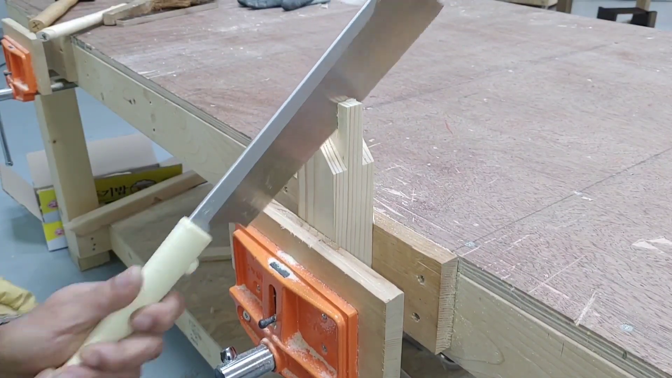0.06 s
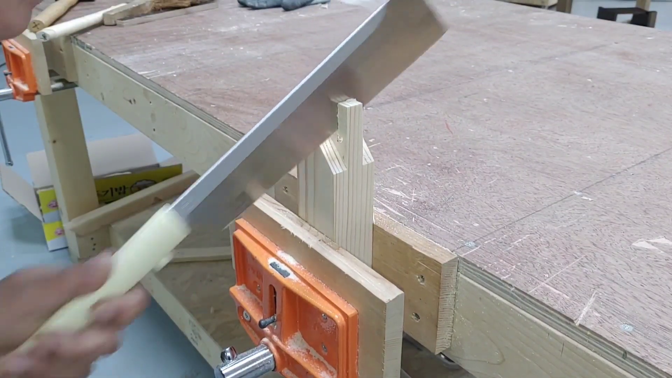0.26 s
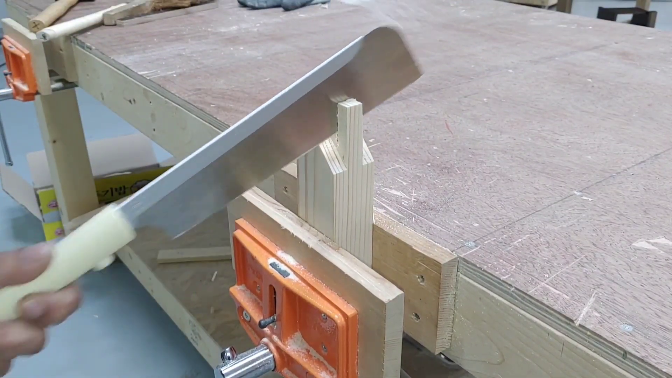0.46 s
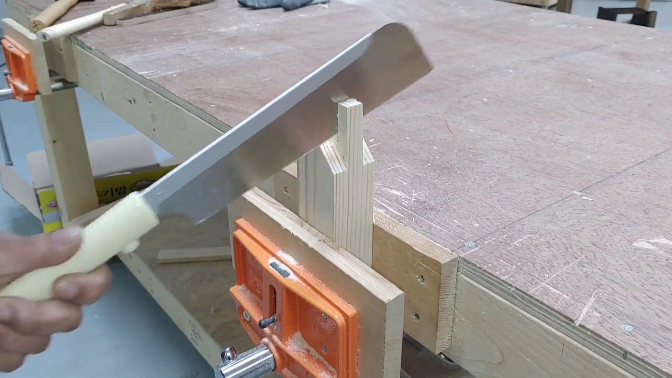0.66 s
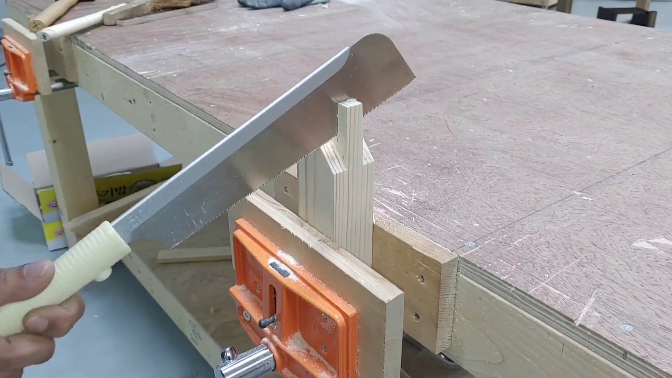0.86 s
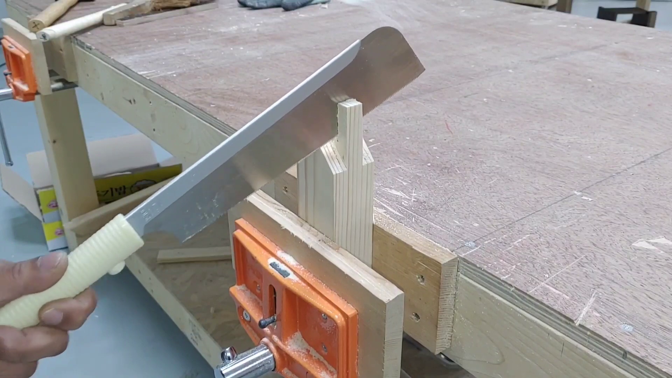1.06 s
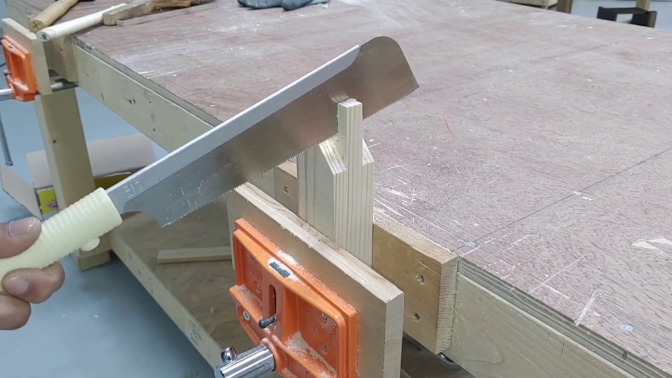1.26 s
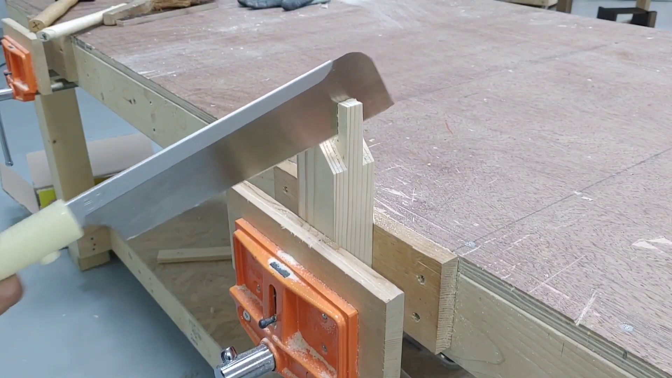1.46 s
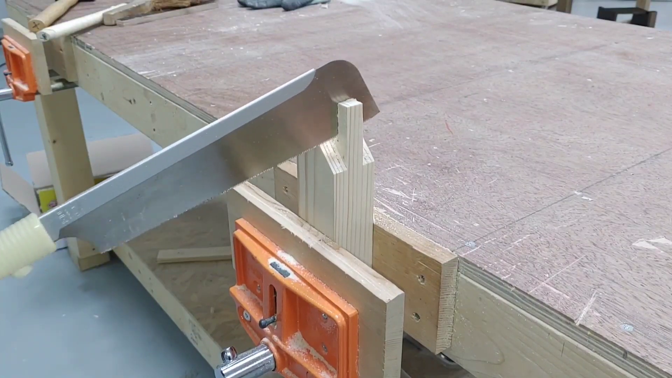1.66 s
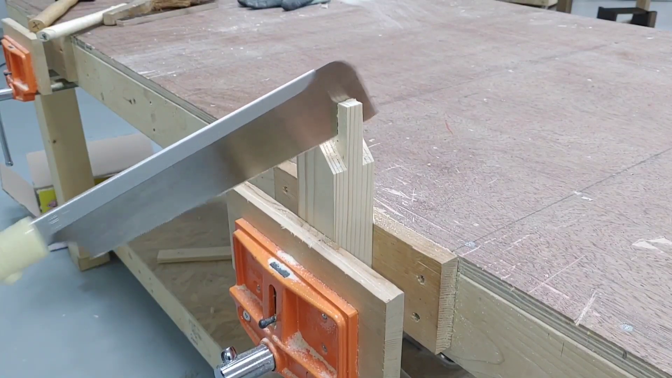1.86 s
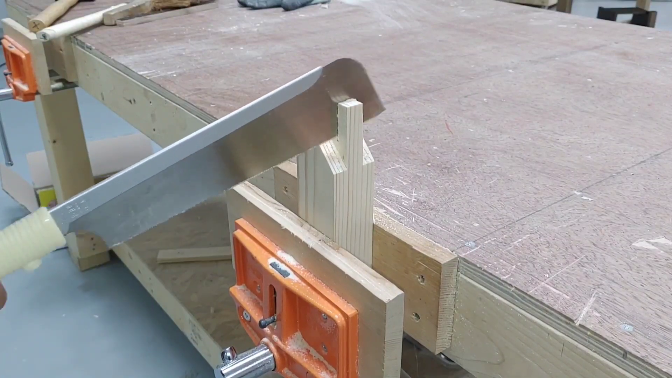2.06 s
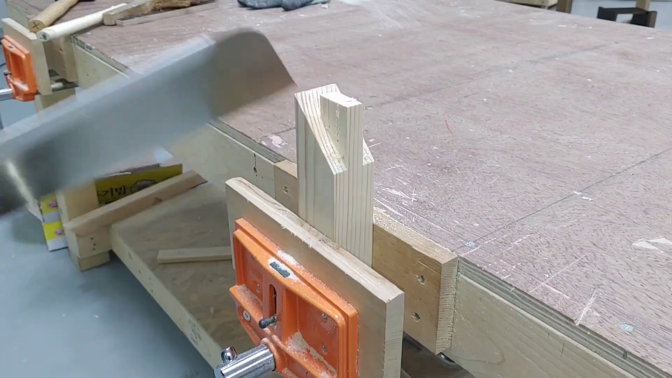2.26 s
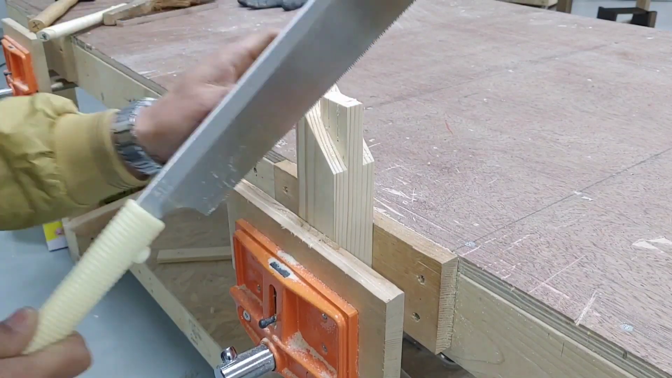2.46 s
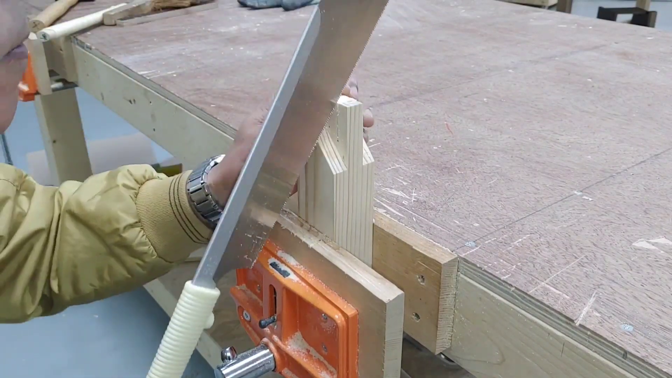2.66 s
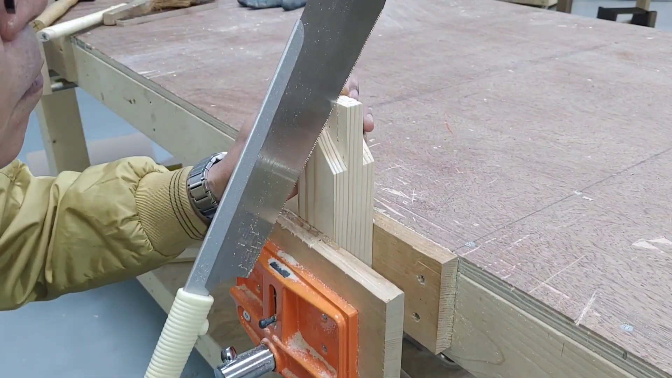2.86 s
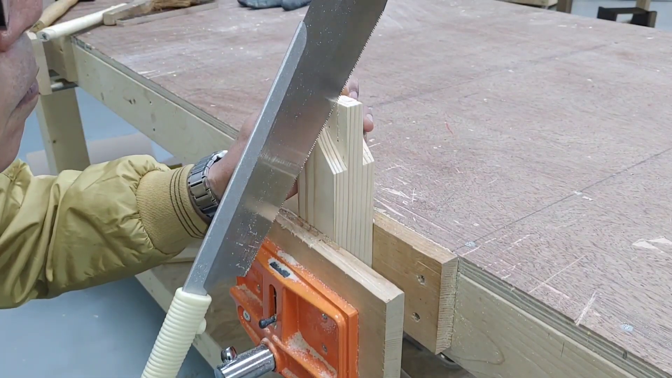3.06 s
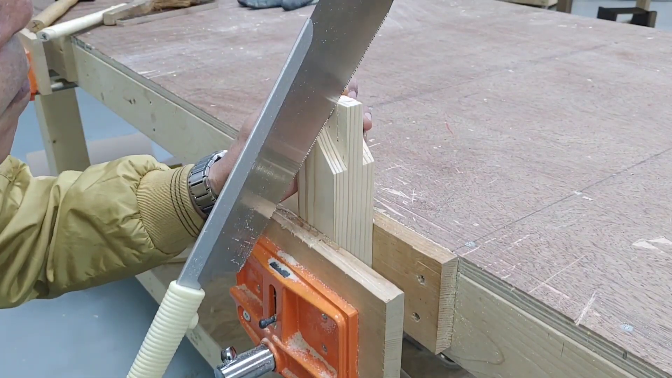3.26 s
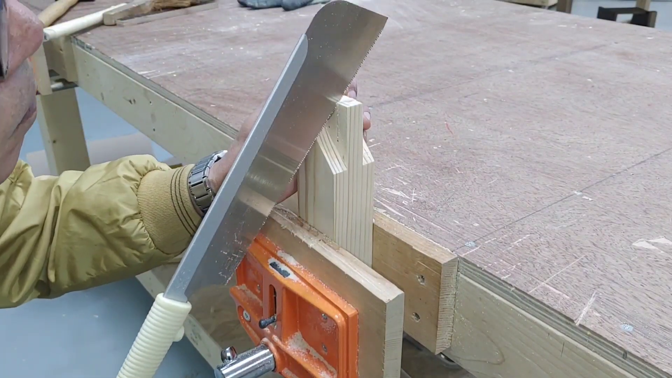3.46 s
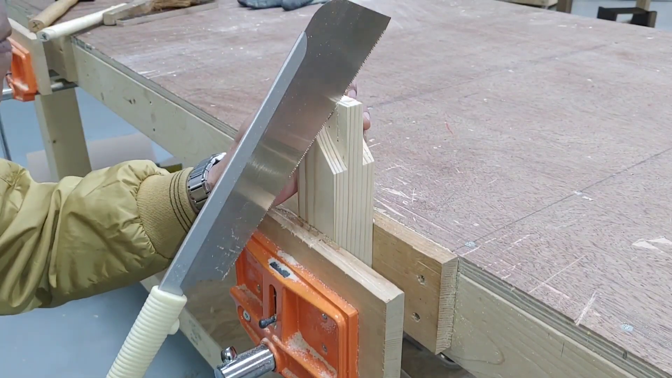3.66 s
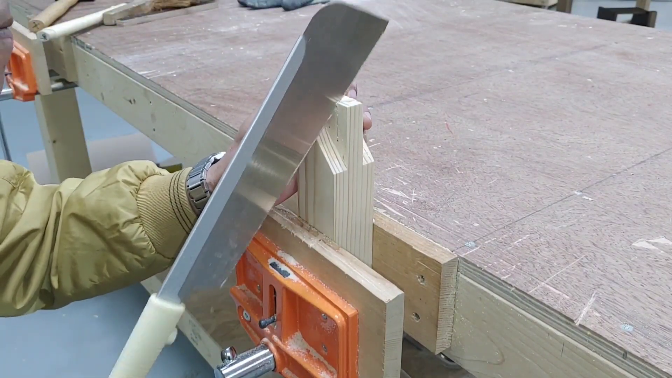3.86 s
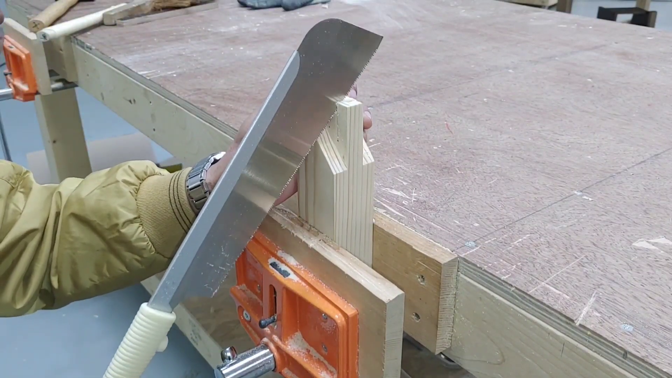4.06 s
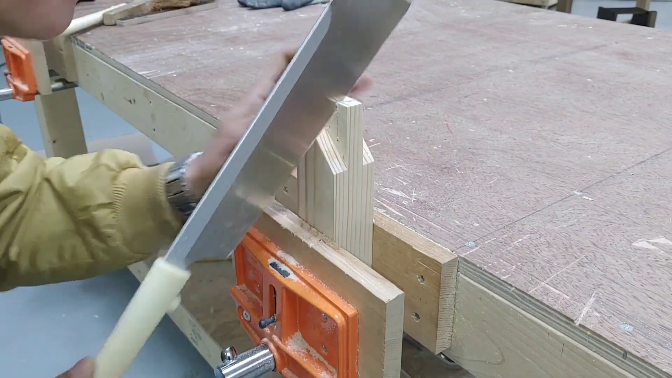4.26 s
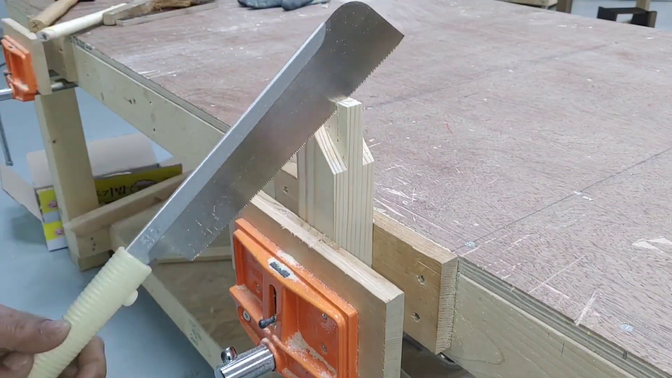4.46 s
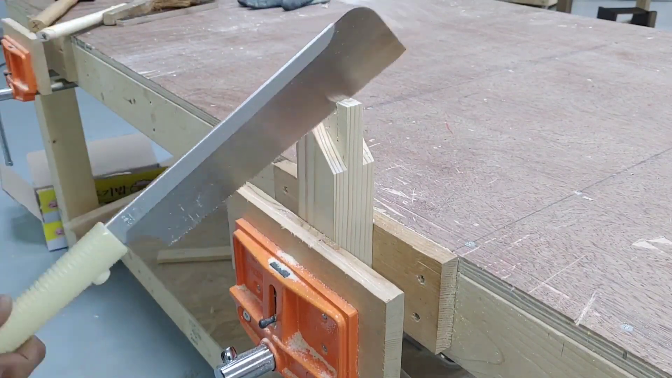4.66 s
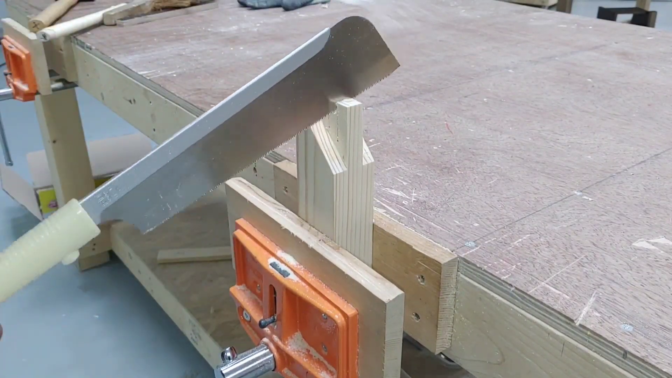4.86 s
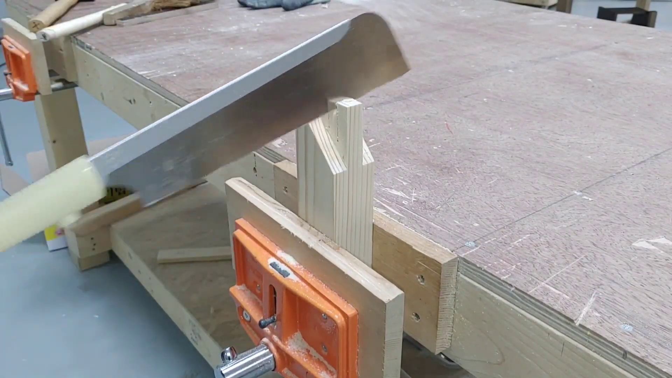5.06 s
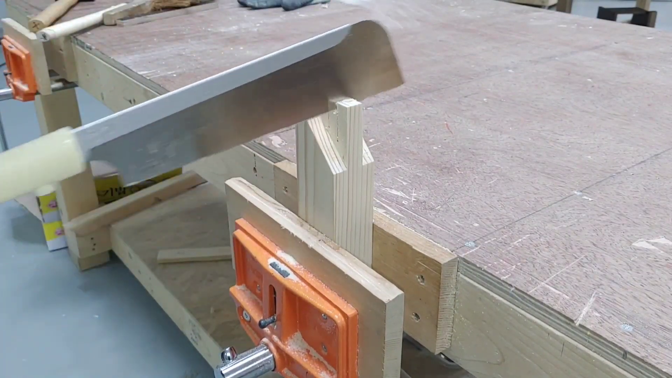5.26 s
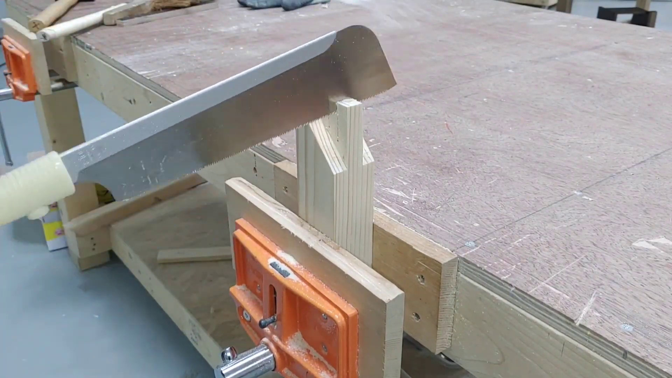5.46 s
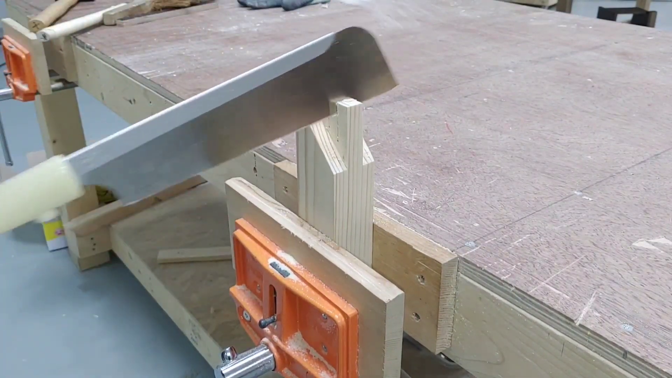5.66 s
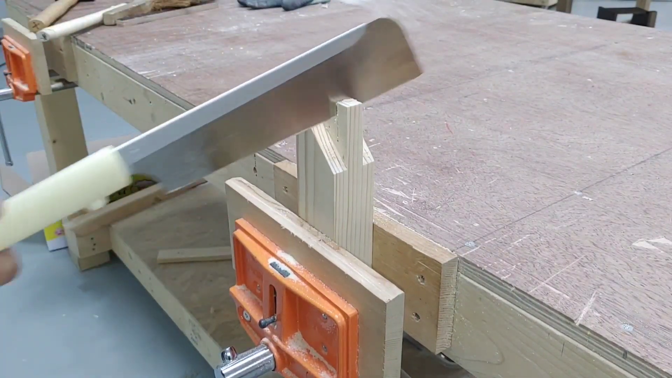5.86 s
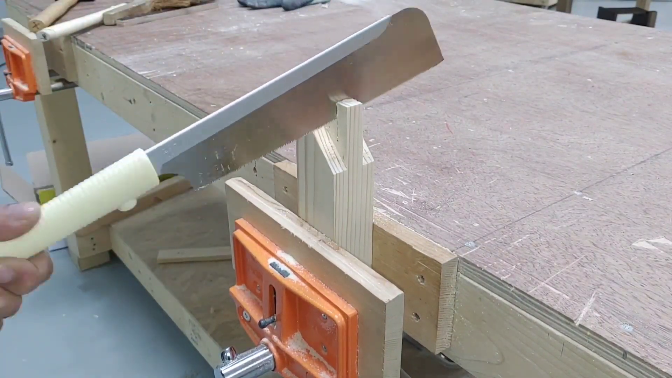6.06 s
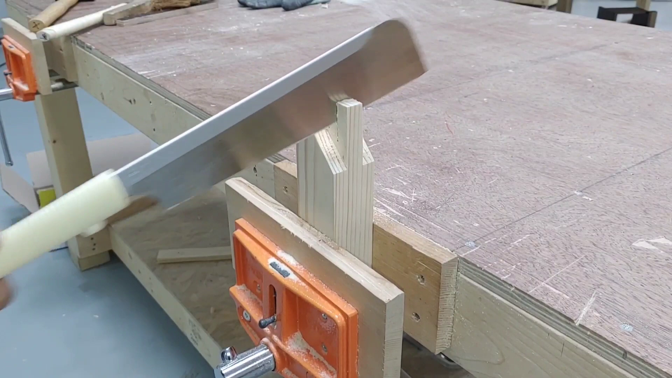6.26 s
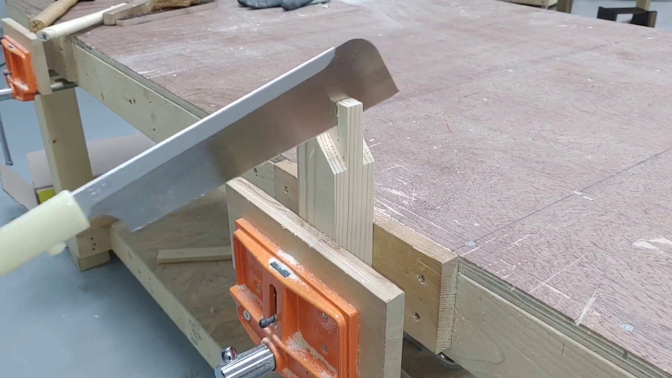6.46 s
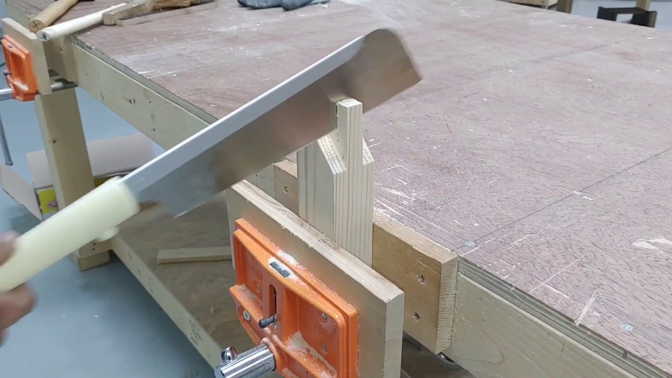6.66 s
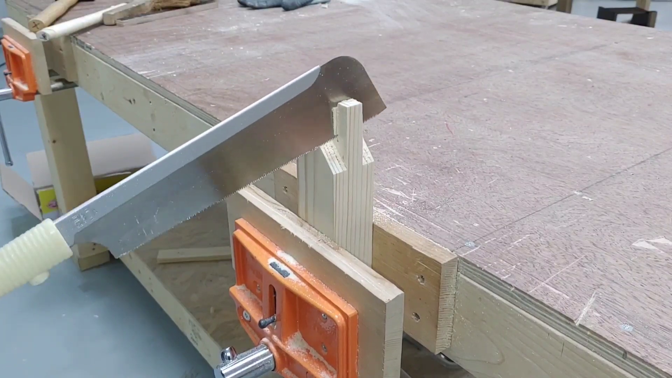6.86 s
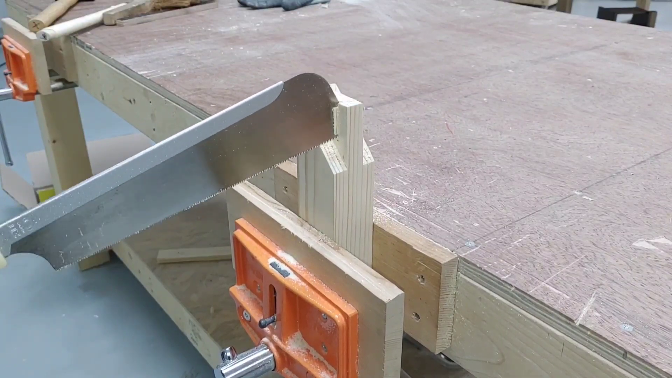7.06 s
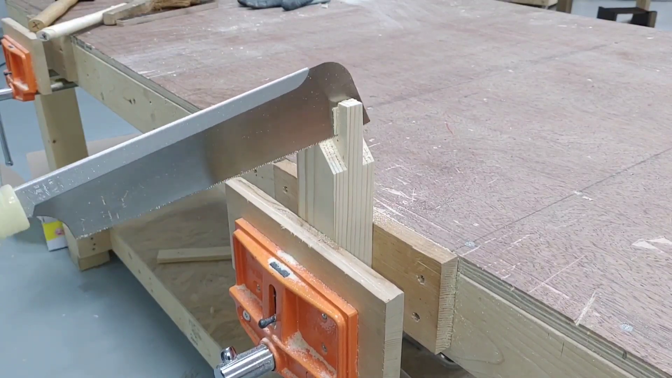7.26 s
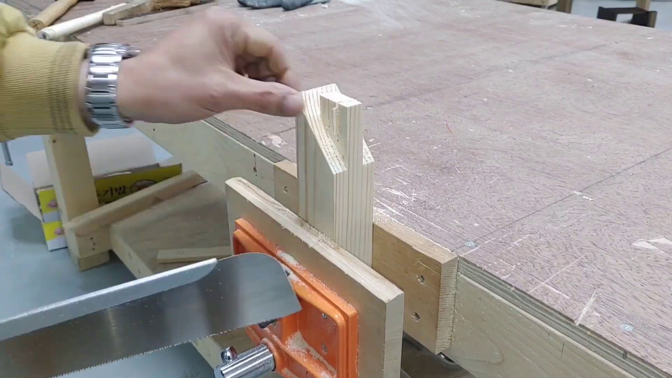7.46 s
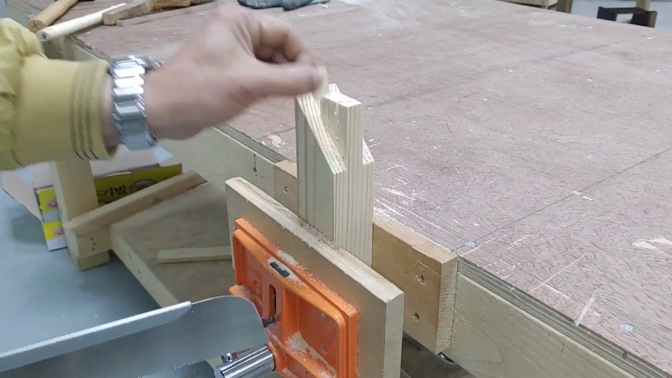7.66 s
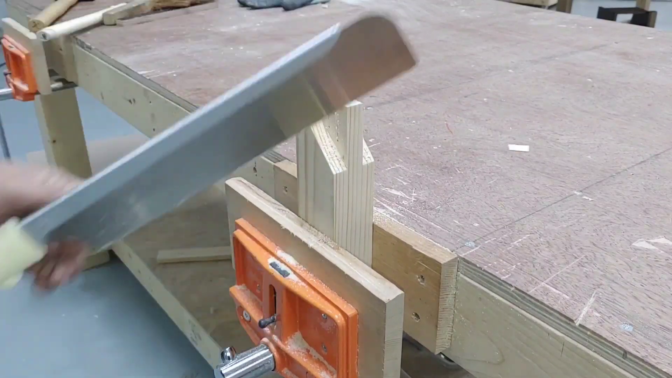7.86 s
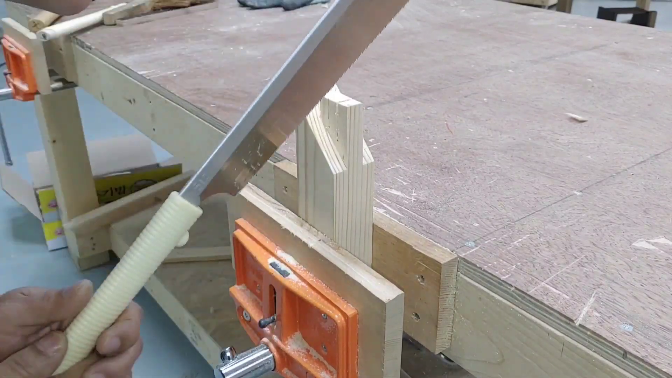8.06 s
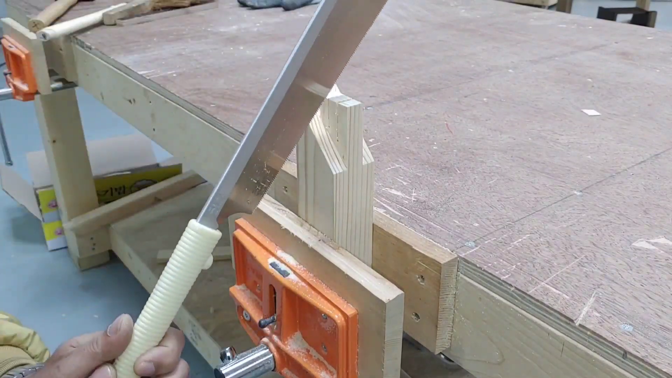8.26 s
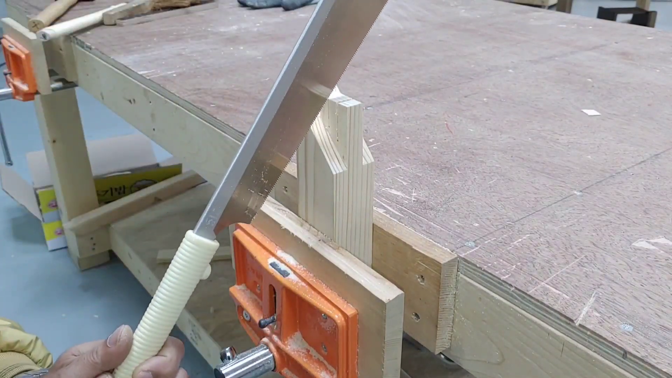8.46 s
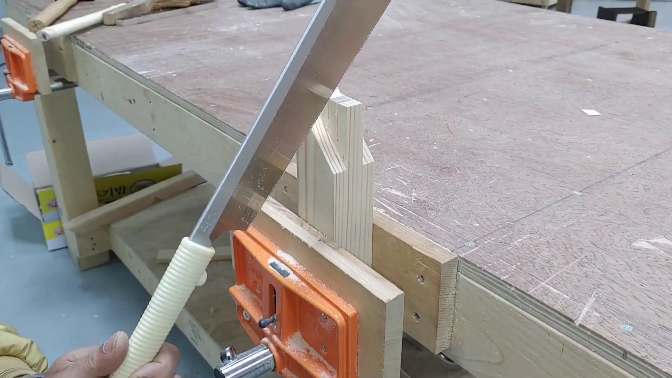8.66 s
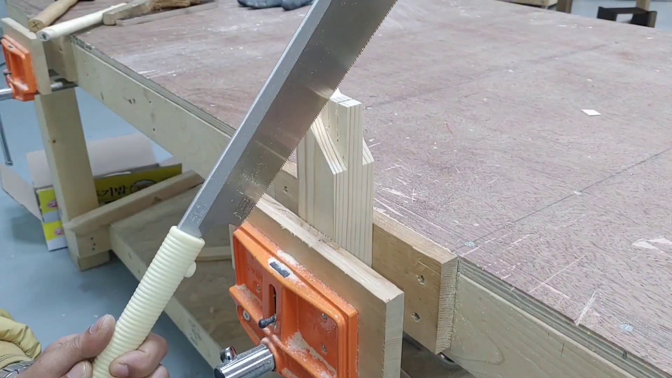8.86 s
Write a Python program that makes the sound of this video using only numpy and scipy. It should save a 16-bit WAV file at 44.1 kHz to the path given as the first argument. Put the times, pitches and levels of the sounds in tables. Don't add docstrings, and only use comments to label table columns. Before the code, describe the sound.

Loud uneven sawing starts at once, each stroke knocking the clamped board and bench, with a few harder tooth catches. It stops; only faint scrapes and low room rumble remain. Hesitant light strokes begin again and grow into an even, fast scratching. The last pulls are sparse and quiet, then a dry crack frees a sliver of wood, which ticks down and bounces before near silence. Close stereo pickup in a small, briefly echoing workshop.

```python
import sys
import numpy as np
from scipy import signal
from scipy.fft import rfft, irfft
from scipy.io import wavfile
from scipy.ndimage import uniform_filter1d

SR = 44100
rng = np.random.default_rng(int(sys.argv[2]) if len(sys.argv) > 2 else 0)


def decibels_to_gain(level_db):
    exponent = np.asarray(level_db, float) / 20
    return 10 ** exponent


def pcm_store(signal):
    levels = np.round(np.clip(np.atleast_2d(signal), -1, 1) * 32767)
    wavfile.write(sys.argv[1], SR, levels.astype(np.int16).T)


N = 392490
SIZE, PAD = 10240, 512
HZ, T = np.maximum(np.fft.rfftfreq(SIZE, 1 / SR), 1), np.arange(SIZE) / SR
LEAD_S = .008

# f/Hz, likeness/0-1
COHERENCE = [(100, 0.94), (300, 0.89), (700, 0.5), (1500, 0), (4000, 0.04)]


def unit(x):
    return x / np.sqrt(np.mean(x ** 2))


def on_log(table, hz=HZ):
    at, value = np.transpose(table)
    return np.interp(np.log(hz), np.log(np.maximum(at, 1)), value)


def modes(table):
    response = 0
    for k, (f, width, db) in enumerate(table):
        damping = 1j * HZ * width
        response = response + (-1) ** k * decibels_to_gain(db) * damping / (f * f - HZ ** 2 + damping)
    return response


def soft(hz):
    return 1 / (1 + 1j * HZ / hz)


def through(x, response):
    return irfft(rfft(x) * response, x.shape[-1])


def played(drive, envelope, response):
    steady = np.sqrt(2 * np.sum(np.abs(rfft(drive) * response) ** 2)) / SIZE
    return through(drive * envelope, response) / steady


def swell(length, db, rise_s, sag_db, fall_s):
    fade = np.exp(-np.maximum(T - length + fall_s, 0) / fall_s)
    rise = np.sin(np.pi / 2 * np.minimum(T / rise_s, 1)) ** 2
    return decibels_to_gain(db - sag_db * T / length) * rise * fade


def pair(alike, size):
    mid, side = rng.standard_normal((2, size))
    alike = np.clip(alike, -1, 1)
    mid = through(mid, np.sqrt((1 + alike) / 2))
    side = through(side, np.sqrt((1 - alike) / 2))
    return np.array([mid + side, mid - side])


def teeth(length, rate_hz, jitter=.35, scatter_db=3.0):
    speed = .8 + .4 * np.sin(np.pi * np.minimum(T / length, 1))
    at = np.flatnonzero(np.diff(np.floor(.6 + np.cumsum(rate_hz * speed / SR))))
    chance = rng.standard_normal((300, 2))[:len(at)]
    knocks = np.zeros(SIZE)
    moved = (at + jitter * chance[:, 0] * SR / rate_hz).astype(int) % SIZE
    np.add.at(knocks, moved, decibels_to_gain(scatter_db * chance[:, 1]))
    return unit(knocks - np.mean(knocks))


def shifted(table, spread, scatter_db):
    chance = rng.standard_normal((len(table), 2))
    return [(f * (1 + spread * a), w, db + scatter_db * b) for (f, w, db), (a, b) in zip(table, chance)]


def stroke(length, blade_db, bench_db, ring_db, rate_hz, sing_db, tilt_db):
    # f/Hz, width/Hz, level/dB
    bench_modes = [(45, 37, -3), (132, 62.5, 2.5), (330, 236, -8.5), (538, 117, -16)]
    board_modes = [(879.4, 61, 5), (878, 590, -6.5), (1540, 310, -14)]
    blade_modes = [(2353, 76, -2.5), (4130, 320, 0.5), (6126, 330, -2.5), (7370, 410, -7),
                   (9820, 1300, -10.5)]
    # f/Hz, level/dB
    fibres = [(300, 1), (1500, -7), (3000, -15), (5000, -28), (8000, -38), (16000, -23)]
    length = length + LEAD_S
    knocks = teeth(length, rate_hz)
    rub = rng.standard_normal((3, SIZE))
    slow = np.log2(250 / rate_hz)

    push = unit(through(knocks, soft(700.))) + 0.51 * unit(through(rub[0], soft(380.0)))
    weight = (np.maximum(HZ, 120) / 220) ** (-1.2 * slow)
    body = modes([(rate_hz, 0.47 * rate_hz, -2.)]) + modes(shifted(bench_modes, 0.047, 1.9)) * weight
    bench = played(push, swell(length, bench_db + 1.0, 0.024, 7.5, 0.0093), body)

    ring = swell(length, ring_db + 0.5, 0.032, 10.33, 0.022)
    board = played(knocks + 1.9 * rub[1], ring, modes(shifted(board_modes, 0.025, 0.78)))

    gate = 6.6 + unit(np.abs(through(knocks, soft(100.0))))
    crackle = rub[2] * gate * decibels_to_gain(0.41 * rng.exponential(size=SIZE))
    hiss = decibels_to_gain(on_log(fibres) - 1.0 + tilt_db * np.log2(np.maximum(HZ / 3000, 1)))
    sing = decibels_to_gain(sing_db + 2.7 * tilt_db * np.log2(HZ / 3000)) * modes(shifted(blade_modes, 0.012, 0.4))
    cut = swell(0.92 * length, blade_db + 6.5, .024 - 0.012 * slow, 10.8 + 6.9 * slow, .012)
    return bench + board + played(crackle, cut, sing + hiss)


def strokes():
    # t/s, pull force level/dB, bite level/dB, return force level/dB (-99 = the saw stalls or lifts)
    fast_cut = [(-.052, -23, -17.5, -99), (.006, -14, -29.5, -24.5), (.098, -17.5, -27, -21.5),
                (.188, -12, -30.5, -16.5), (.283, -18, -32.5, -21.5), (.386, -17.5, -30.5, -21),
                (.47, -22, -32, -19), (.567, -17, -30.5, -20.5), (.662, -19, -31, -24.5),
                (.744, -21, -35, -24), (.826, -19, -37, -28), (.91, -16.5, -35.5, -24.5),
                (.978, -24.5, -36, -29), (1.045, -26, -41.5, -27)]
    choppy_cut = [(1.131, -17, -37, -23), (1.199, -19, -36, -25.5), (1.296, -26, -33.5, -60),
                  (1.391, -15.5, -30.5, -21), (1.549, -17.5, -36, -25.5), (1.64, -15, -31, -29),
                  (1.709, -17.5, -35, -29.5), (1.789, -15, -34, -27), (1.851, -15, -32.5, -24),
                  (1.924, -13.5, -32.5, -29), (2.069, -13.5, -36.5, -26.5), (2.158, -19.5, -34, -25),
                  (2.225, -13, -30.5, -26), (2.29, -13, -33.5, -24), (2.356, -19, -36, -22),
                  (2.423, -16, -38.5, -43)]
    new_kerf = [(3.298, -45.5, -77, -99), (3.563, -43.5, -62, -99), (3.64, -38, -59.5, -67),
                (3.703, -33.5, -55, -99), (3.845, -36, -56, -99), (3.897, -26.5, -60, -63),
                (3.952, -29.5, -44.5, -99), (4.015, -30, -48.5, -99), (4.065, -20.5, -35.5, -99),
                (4.11, -22, -41, -99), (4.159, -27, -38, -23), (4.245, -22, -35.5, -99),
                (4.379, -24.5, -43, -24.5), (4.469, -21, -33, -24.5), (4.528, -23, -34.5, -23.5),
                (4.581, -24.5, -32, -99)]
    steady_cut = [(4.771, -28, -47.5, -35), (4.845, -28, -36, -27.5), (4.945, -25.5, -35.5, -30.5),
                  (5.046, -24, -34.5, -25), (5.124, -20.5, -35.5, -31.5), (5.265, -26, -35.5, -31.5),
                  (5.36, -21.5, -36, -25), (5.454, -22, -31.5, -25.5), (5.539, -20, -33.5, -23.5),
                  (5.635, -21, -32, -24), (5.723, -24.5, -32, -22), (5.821, -22, -31, -25),
                  (5.911, -21, -31, -22.5), (6.006, -21, -29, -20), (6.091, -19, -33, -21.5),
                  (6.187, -22.5, -32, -22.5), (6.28, -19.5, -32, -21.5), (6.373, -18.5, -33.5, -20.5),
                  (6.456, -17, -32, -20.5), (6.541, -16, -32.5, -21), (6.64, -16.5, -31, -22),
                  (6.716, -15.5, -33, -18.5), (6.807, -17, -33, -21.5), (6.896, -15.5, -31, -99)]
    last_fibres = [
        (7.036, -30.5, -45, -47),
        (7.107, -29, -40, -43),
        (7.292, -37, -53.5, -40.5),
        (7.402, -21, -41.5, -40.5),
    ]
    # t/s, blade ring level/dB, hiss tilt/dB per octave, tooth rate f/Hz, board over bite level/dB
    kerf = [(0, -2.5, -5, 261.8, 3), (.75, -2.5, -3.5, 275.1, 12), (1.001, -1.5, -3.5, 234.6, 9),
            (1.141, -5.5, -4, 158.8, 5), (1.302, -11.5, -4, 188.6, -9), (1.55, -5.5, -4, 217.9, 11),
            (1.852, -6.5, -3, 158.8, 7), (2.102, 2, -5.5, 216.8, 9.5), (2.5, -5.5, -2, 173.6, 12),
            (3.5, -10, 0, 189, -2), (4.098, -7.5, -2, 193.7, 0), (4.399, -11, -1.5, 255, 5),
            (4.702, -6.5, -2, 201.2, 8.5), (5.3, -0.5, -2, 243.5, 9.5), (5.852, -4.5, -2, 292.9, 10.5),
            (6.052, -4, -2, 250.7, 10), (6.7, -5, -3, 299.5, 13), (7.402, -5, -2.5, 184.6, 7.5)]
    longest_stroke_s = .104
    speed_scatter, return_speed = .06, 1.15
    return_blade_db, return_ring_db = -17, -15

    table = fast_cut + choppy_cut + new_kerf + steady_cut + last_fibres
    at, *columns = np.transpose(kerf)
    for (s, pull_db, bite_db, back_db), (later, *_) in zip(table, table[1:] + [(np.inf,)]):
        if later - s > longest_stroke_s:
            pull_s, back_at_s, back_s = .033, .042, .055
        else:
            pull_s, back_at_s, back_s = (later - s) * np.array([.46, .55, .42])
        sing_db, tilt_db, rate_hz, ring_db = (np.interp(s, at, column) for column in columns)
        rate_hz = rate_hz * (1 + speed_scatter * rng.standard_normal())
        yield s - LEAD_S, stroke(pull_s, bite_db, pull_db, bite_db + ring_db, rate_hz, sing_db, tilt_db)
        if back_db > -80:
            back = stroke(back_s, bite_db + return_blade_db, back_db, back_db + ring_db + return_ring_db,
                          return_speed * rate_hz, sing_db, tilt_db)
            yield s + back_at_s - LEAD_S, back


def shop(hz):
    # f/Hz, level/dB per Hz
    rumble = [(34, -11.5), (78, -11), (124, -4), (221, -14.5), (616, -20), (4910, -32), (7870, -39),
              (16000, -31)]
    level_db = -59.5
    air = through(pair(on_log(COHERENCE, hz), size=N), decibels_to_gain(on_log(rumble, hz)))
    waver = unit(uniform_filter1d(rng.standard_normal(N), size=3000))
    return unit(air) * decibels_to_gain(level_db + 1.4 * waver)


def tick(db, hz, t60, knock_db, edge_db):
    crack = 0.14 * rng.standard_normal(SIZE) * np.exp(-np.log(1000) * T / max(t60, .002))
    crack[0] = 1
    middle = modes([(hz, 0.54 * hz, 0)]) * modes([(hz, 1.06 * hz, 0)])
    knock = modes([(607, 840, -1), (2000, 1270, -5.5)])
    edge = modes([(11200, 2700, 0)]) ** 2
    total = 0
    for response, rel_db in [(middle, 0), (knock, knock_db), (edge, edge_db)]:
        x = through(crack, response)
        total = total + decibels_to_gain(db + rel_db - 0.5) * x / np.max(np.abs(x))
    return total


def snaps():
    # t/s, peak level/dB, centre f/Hz, T60/s, top edge level/dB
    table = [
        (.021, -19, 6600, 0.013, -25),
        (4.32, -36, 6500, 0.007, -6),
        (4.755, -39, 3600, 0.0089, -30),
        (7.5065, -8.5, 4480, 0.0059, -8),
        (7.5124, -30.5, 9000, .07, -20),
        (8.0001, -28.5, 4350, 0.0033, -28.5),
        (8.0016, -25.5, 3200, 0.0043, -30),
        (8.0374, -39, 3700, .005, -4),
        (8.2603, -32, 3520, 0.0065, 0.5),
    ]
    for s, db, centre_hz, t60, edge_db in table:
        yield s, tick(db, centre_hz, t60, -8, edge_db)


def tooth_catches():
    # t/s, peak level/dB, centre f/Hz, T60/s, wood knock level/dB
    table = [(0.2925, -15.5, 1750, 0.016, -8.5), (1.298, -14.5, 1700, 0.01, -18),
             (1.3926, -16, 1340, 0.0077, -29), (1.6433, -23.5, 1380, 0.021, -6),
             (1.935, -16.5, 1470, 0.0086, -13), (1.556, -25, 1700, 0.011, -3.5),
             (2.0758, -18.5, 1970, 0.019, -4), (1.209, -26.5, 2540, .012, -4),
             (1.791, -29, 2400, .012, -12), (2.163, -25, 2300, 0.015, -10),
             (2.369, -27.5, 2280, 0.026, -18), (2.905, -64, 1210, 0.017, 11.5),
             (4.0717, -30.5, 1360, 0.0099, -28)]
    for s, *controls in table:
        yield s, tick(*controls, edge_db=-37)


def scrape(length, db, hz, squeak_db):
    # f/Hz, level/dB
    rubbing = [(100, -3), (400, 3.5), (1500, 1), (3500, -2.5), (5000, -8), (9000, -17.5), (16000, -19)]
    grit = rng.standard_normal(SIZE) * decibels_to_gain(2.95 * rng.exponential(size=SIZE))
    colour = decibels_to_gain(on_log(rubbing) - 14.5) + modes([(hz, 0.045 * hz, squeak_db + 6.0)])
    return played(grit, swell(length, db, 0.019, 2.2, 0.0099), colour)


def scrapes():
    # t/s, length/s, level/dB, squeak f/Hz, squeak level/dB
    table = [(2.611, 0.05, -41, 3310, -12.5), (2.786, 0.083, -64.5, 690, -11),
             (3.503, 0.056, -58.5, 640, 28), (7.824, 0.042, -60, 6500, -38.5),
             (7.549, 0.11, -65, 4300, -12), (8.033, 0.092, -61, 2170, -19), (8.174, 0.04, -39, 3240, -10.5),
             (8.262, 0.04, -60, 3400, -19), (8.339, 0.07, -63.5, 710, -10), (8.473, 0.046, -68, 497, -9),
             (8.834, 0.057, -75, 2500, -16), (4.352, 0.027, -41, 3300, -17)]
    for s, *controls in table:
        yield s, scrape(*controls)


def echo(x, noise, t60):
    decay = np.exp(-2 * np.log(1000) / (t60 * SR))
    tail = noise * np.sqrt(signal.lfilter([1], [1, -decay], x ** 2))
    return rfft(tail / np.sqrt(np.sum(tail ** 2) / 2))


def propagation():
    # f/Hz, level/dB
    left_over_right = [(60, 0), (380, -1), (700, -5), (1290, -1.5), (2380, -3), (4400, 2), (8120, 4.5),
                       (15000, 1)]
    # f/Hz, level/dB
    room = [(100, -6), (600, 6), (2500, 0.5), (8000, -7), (16000, 0.5)]
    port_lag_s, bench_top_db = .00009, 3
    side = decibels_to_gain(np.array([[.5], [-.5]]) * on_log(left_over_right))
    delay = np.exp(-2j * np.pi * HZ * np.array([[0], [port_lag_s]]))
    bounce = side * decibels_to_gain(bench_top_db) * np.abs(1 - soft(480.0))
    return side * delay, bounce, side * decibels_to_gain(on_log(room))


def add(out, s, x, air, paths, wet_db=0, t60=0.24):
    direct, bounce, late = paths
    x = np.roll(x, PAD)
    first = rng.integers(air.shape[1] - 2 * SIZE)
    near, far = air[:, first:first + SIZE], air[:, first + SIZE:first + 2 * SIZE]
    spectrum = rfft(x)
    colour = np.sqrt(uniform_filter1d(np.abs(spectrum) ** 2, size=27))
    bench_top_t60_s = 0.017
    wet = colour * (bounce * echo(x, near, bench_top_t60_s) + late * echo(x, far, t60))
    i = SIZE + int(s * SR) - PAD
    out[:, i:i + SIZE] += irfft(spectrum * direct + decibels_to_gain(wet_db) * wet, SIZE)


def scene():
    out = np.zeros((2, N + 2 * SIZE))
    hz = np.maximum(np.fft.rfftfreq(N, 1 / SR), 1)
    air = pair(on_log(COHERENCE, hz), size=N)
    paths = propagation()
    for s, x in strokes():
        add(out, s, x, air, paths)
    for s, x in snaps():
        add(out, s, x, air, paths, wet_db=-3.0, t60=0.16)
    for s, x in tooth_catches():
        add(out, s, x, air, paths, wet_db=3.5)
    for s, x in scrapes():
        add(out, s, x, air, paths, wet_db=-0.5)
    return out[:, SIZE:SIZE + N] + shop(hz)


def top_cut(x):
    return signal.sosfilt(signal.butter(12, 16960, fs=SR, output="sos"), x)


def record(dry):
    top_hz = 15900
    low_pass = signal.ellip(8, .2, 40, top_hz, fs=SR, output="sos")
    mix = signal.sosfilt(low_pass, 1.148 * np.tanh(dry)) - .0027
    return top_cut(mix)


dry = scene()
out = record(dry)
pcm_store(out)
```